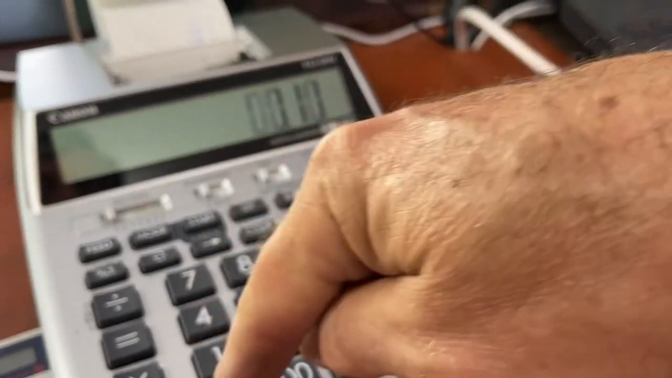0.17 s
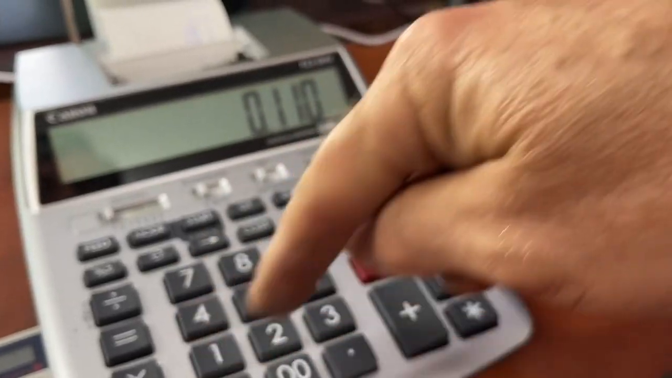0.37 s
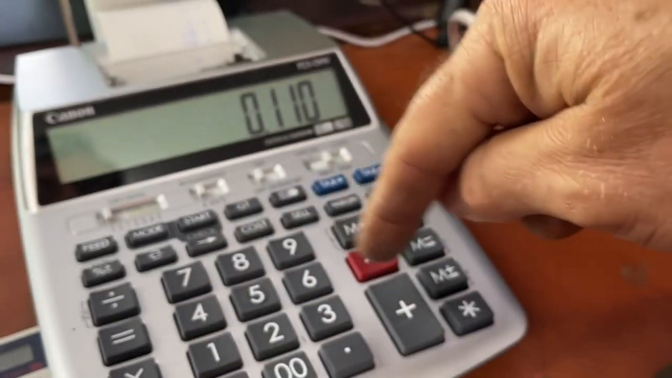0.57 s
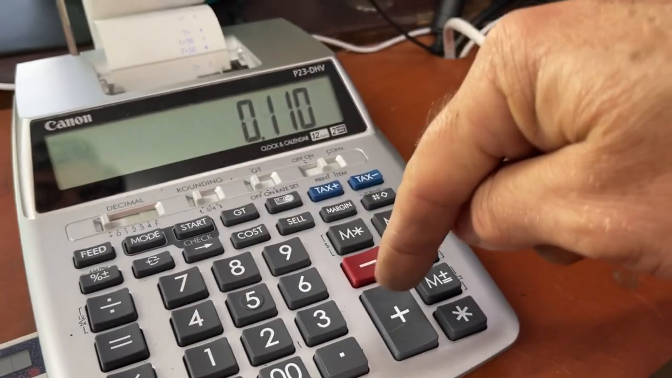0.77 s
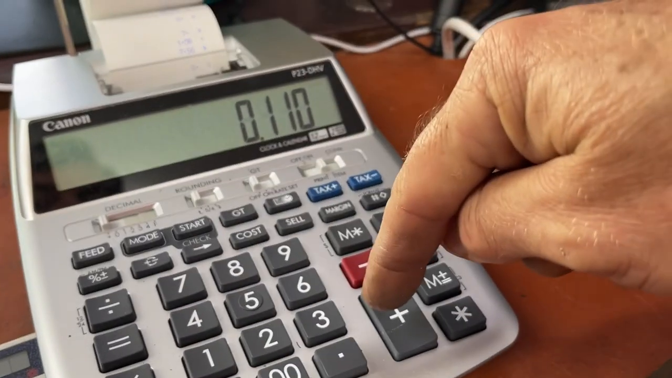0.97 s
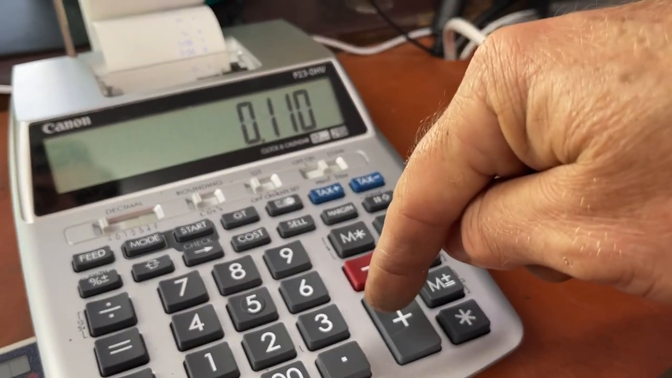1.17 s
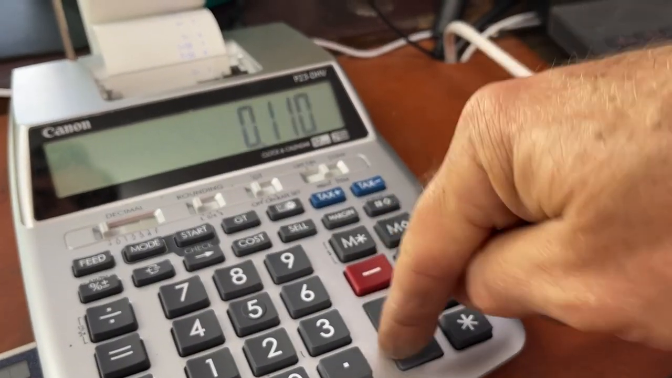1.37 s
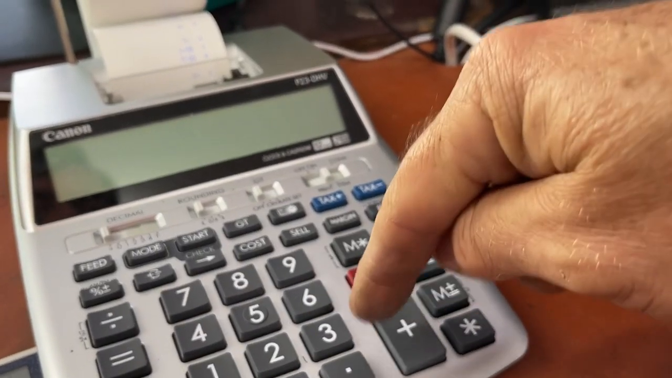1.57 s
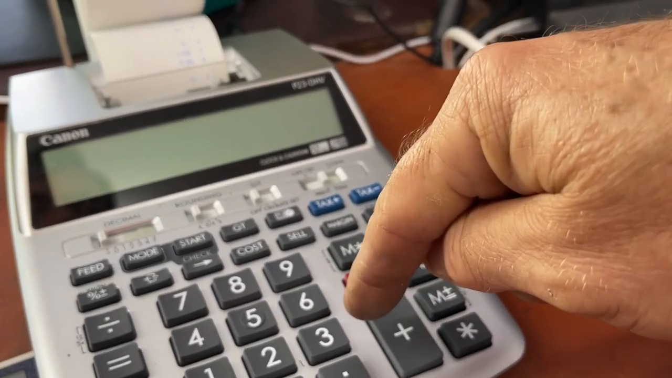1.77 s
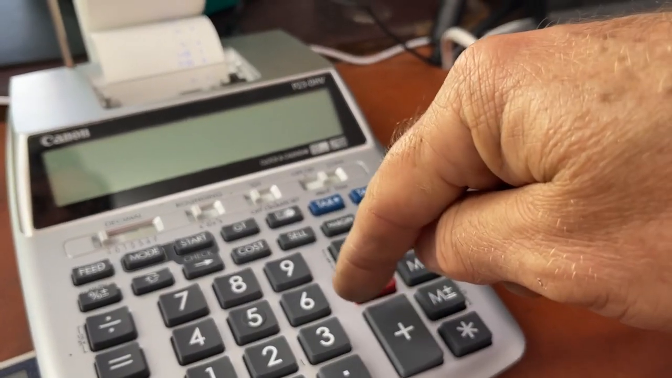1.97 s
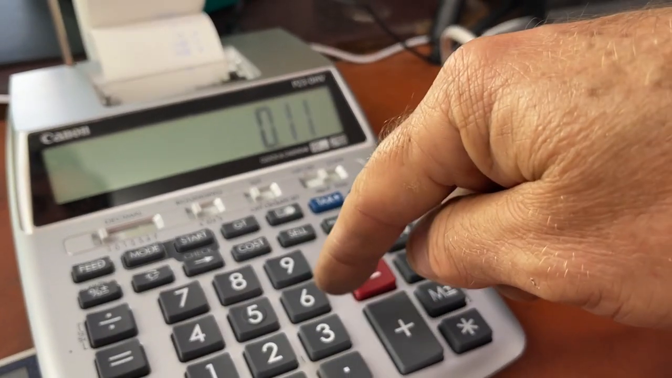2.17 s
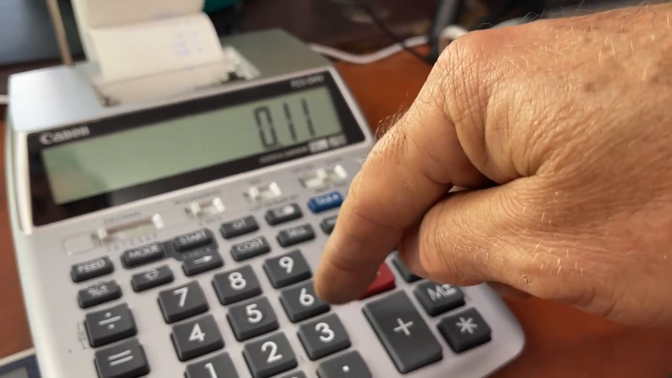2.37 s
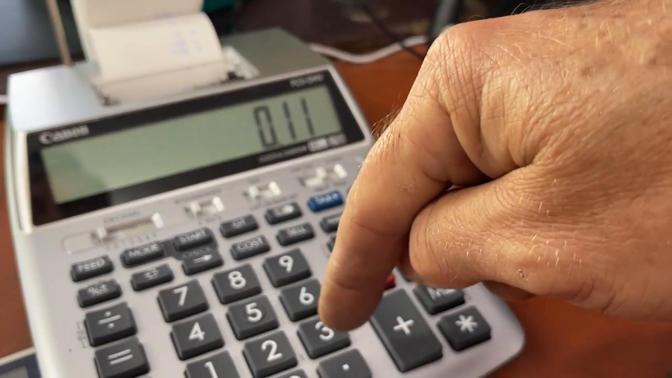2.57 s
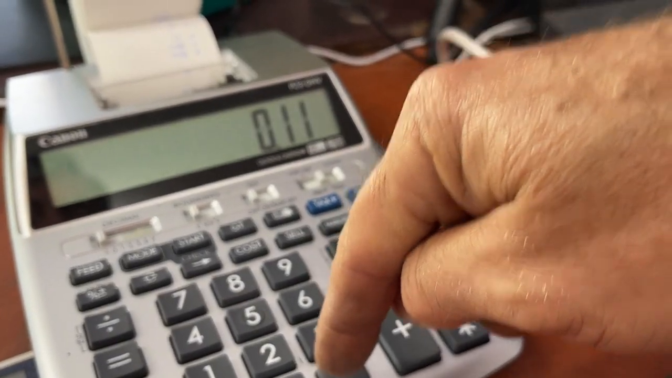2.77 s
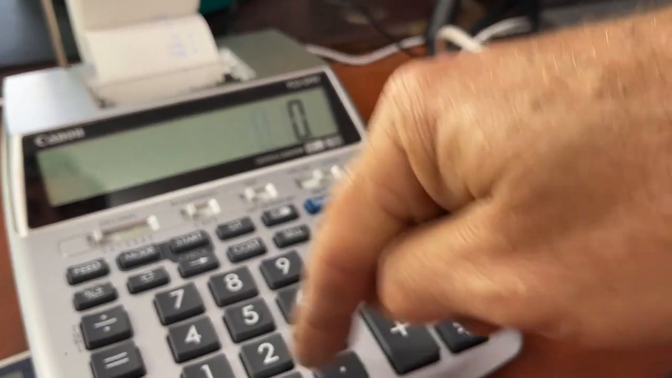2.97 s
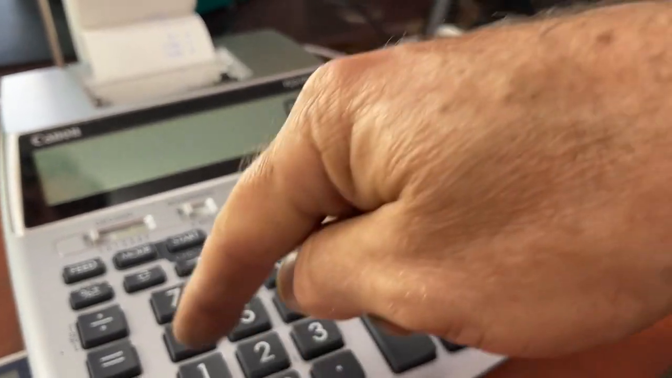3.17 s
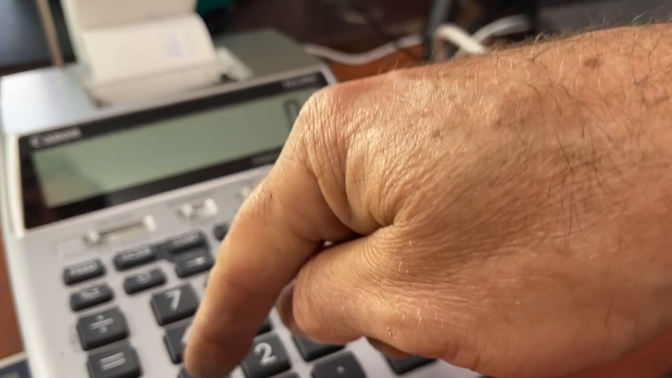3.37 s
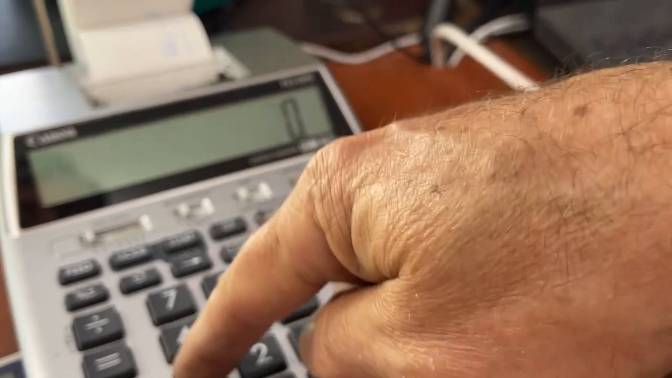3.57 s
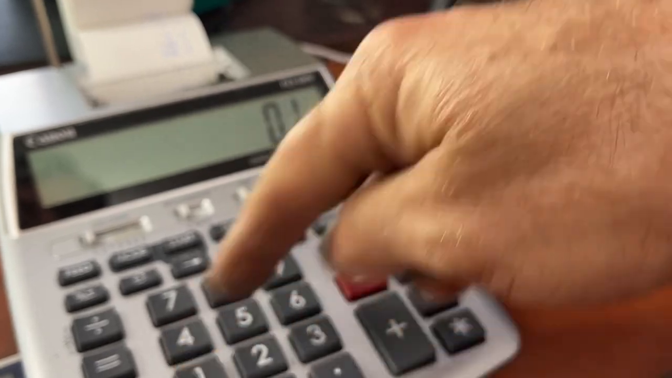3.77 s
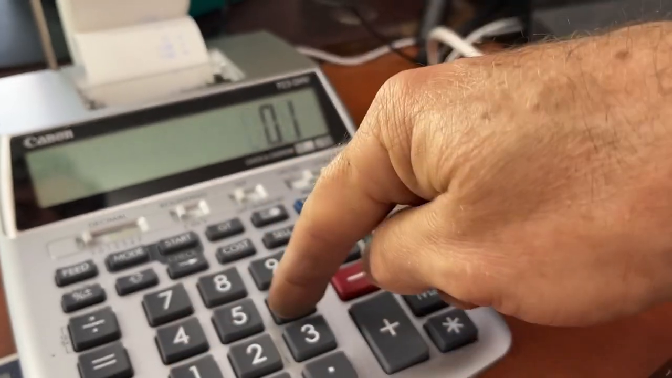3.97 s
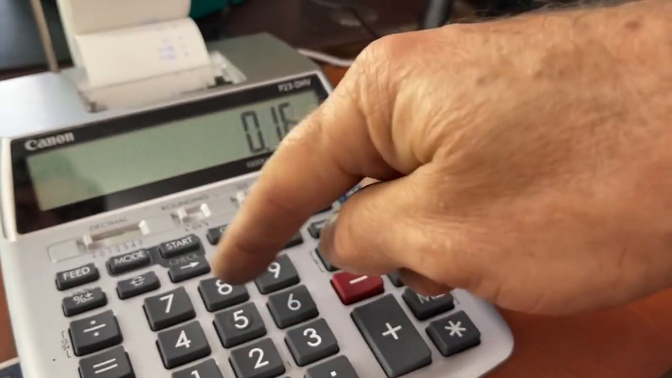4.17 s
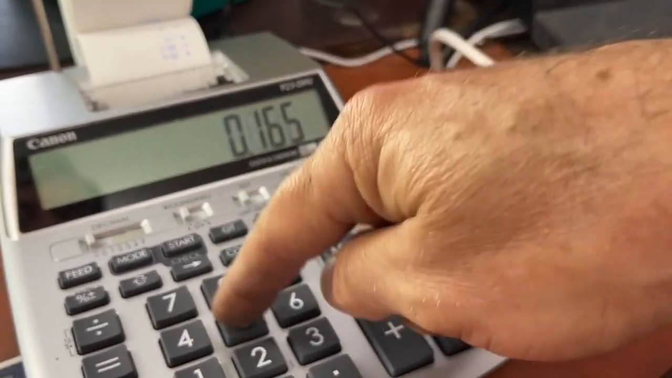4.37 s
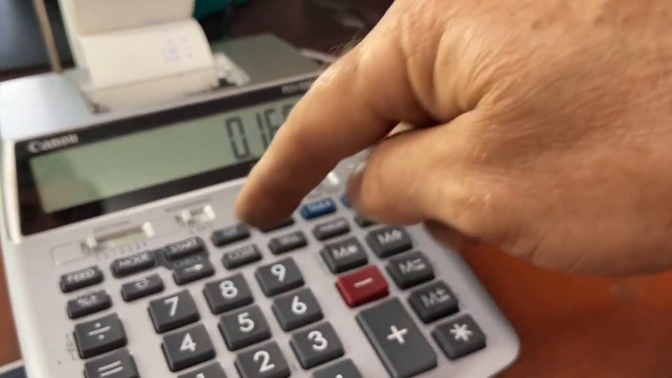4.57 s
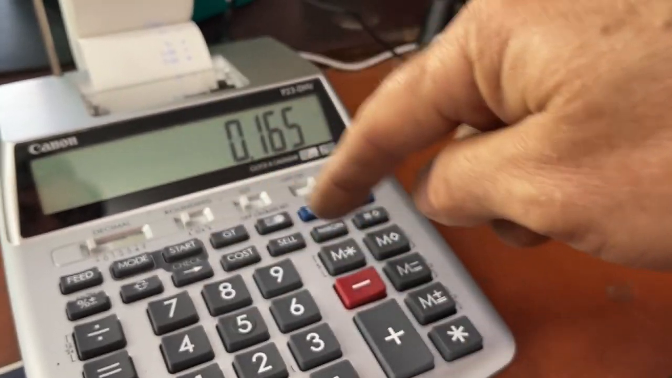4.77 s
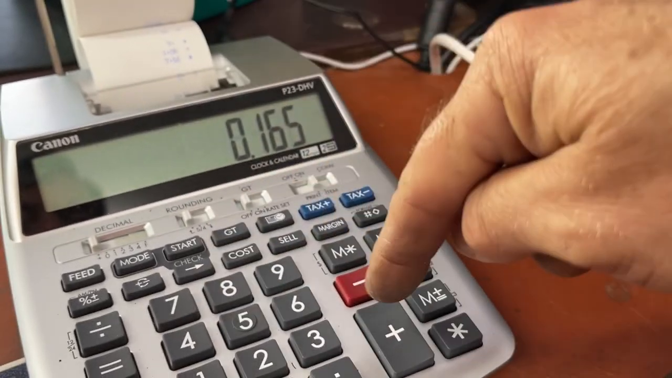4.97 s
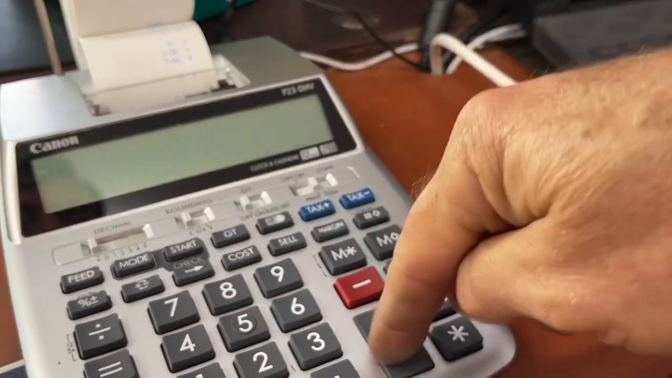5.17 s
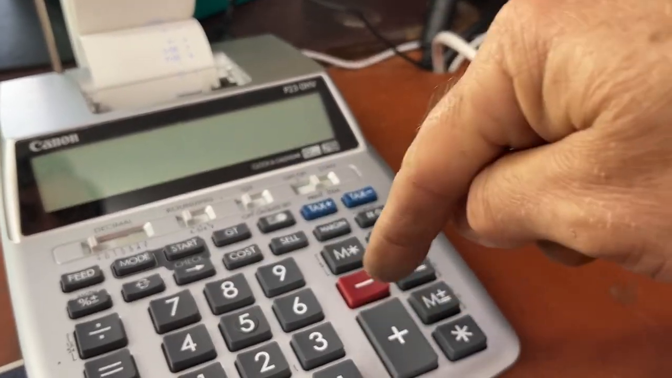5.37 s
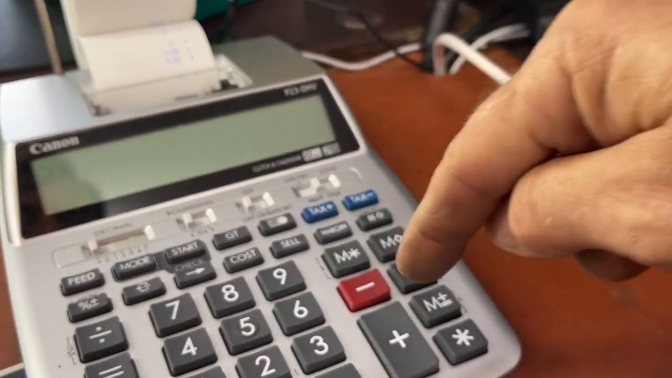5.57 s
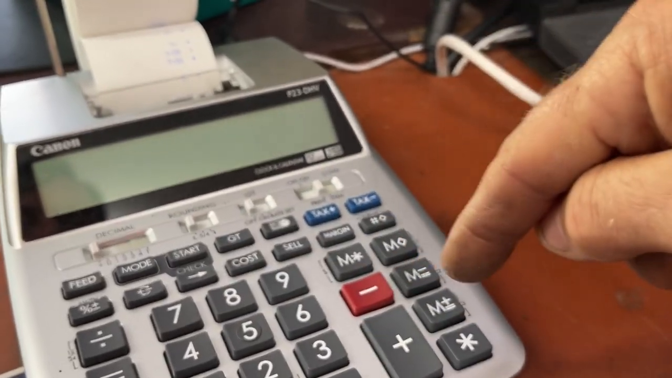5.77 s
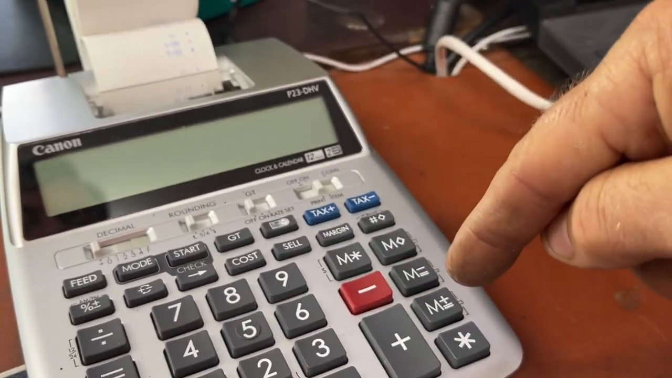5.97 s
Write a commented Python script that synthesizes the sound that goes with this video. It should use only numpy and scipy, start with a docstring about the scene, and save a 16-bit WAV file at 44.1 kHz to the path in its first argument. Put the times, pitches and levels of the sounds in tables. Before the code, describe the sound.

Close stereo pickup of plastic keys and a tiny printer on a desk. Single clicks with springy releases and soft case thumps come first and between two printing bursts. Each burst has a motor spinning up into a gritty, high whine under fast, snapping clatter, about ten strikes a second. A steady low hum and soft air fill the quiet room, with only a short dull reverberation.

```python
"""A quiet room with a low hum, and a desktop printing calculator close by.
Plastic keys click down and up: short bursts of tiny impacts ring each key cap and thump the case.
Twice a small geared motor spins up and prints a line; its sound follows the turning of its gear teeth.
For each character a pawl catches the type wheel, the type snaps on the paper and the lever falls back.
Fan and mains hum are wavering sine tones, over a soft rush of air made from coloured noise."""
import sys
import numpy as np
from scipy import signal
from scipy.fft import rfft, irfft, next_fast_len
from scipy.io import wavfile
from scipy.ndimage import uniform_filter1d

SR = 44100
rng = np.random.default_rng(int(sys.argv[2]) if len(sys.argv) > 2 else 0)


def generate_wav(sig):
    """Save sig (samples, or channels by samples) to the path in sys.argv[1] as 16-bit PCM at SR."""
    pcm = np.round(np.clip(np.atleast_2d(sig).T, -1, 1) * 32767).astype(np.int16)
    wavfile.write(sys.argv[1], SR, pcm)


N = 265393  # length of the scene in samples
TIME = np.arange(N) / SR
SIZE = 4096  # samples in one contact sound and in each body's response


def undb(db):
    """Turn decibels into an amplitude factor."""
    return 10 ** (np.asarray(db) / 20)


def unit(x):
    """Scale to an rms level of 1."""
    return x / np.sqrt(np.mean(x ** 2))


def wander(size):
    """Smooth random curve of rms 1: noise averaged over size samples."""
    return unit(uniform_filter1d(rng.standard_normal(N), size=size))


def bins(size):
    """Frequencies in Hz of a spectrum of size samples, kept at 1 Hz or more."""
    return np.maximum(np.arange(size // 2 + 1) * SR / size, 1)


def along(points, hz):
    """Read a curve of (Hz, value) points, with straight lines on a log-frequency axis."""
    point_hz, value = np.transpose(points)
    return np.interp(np.log(hz), np.log(point_hz), value)


def colour(points, size=SIZE):
    """Filter with the given (Hz, dB) outline that responds only after it is struck."""
    cepstrum = irfft(np.log(undb(along(points, bins(size)))))
    # folding the second half onto the first makes the filter minimum phase
    cepstrum[1:size // 2] *= 2
    cepstrum[size // 2 + 1:] = 0
    return np.exp(rfft(cepstrum))


def resonances(modes):
    """Filter of a body that rings at several (Hz, width Hz, dB) modes; a narrow mode rings longer."""
    f = bins(SIZE)
    total = 0
    for k, (hz, width, db) in enumerate(modes):
        sign = (-1) ** k
        total = total + sign * undb(db) / (1 + 1j * (f * f - hz * hz) / (f * width))
    return total


def add(out, s, db, body, rise, fall, scatter_db=0, blow=0):
    """Add one contact: tiny impacts swell and die (rise, fall in s) around a main blow, ringing a body."""
    lead = SIZE // 8
    t = (np.arange(SIZE) - lead) / SR
    envelope = np.exp(-np.maximum(-t / rise, t / fall))
    force = rng.choice([-1, 1], SIZE) * envelope
    force *= undb(scatter_db * rng.standard_normal(SIZE))
    force[lead] += blow * np.sqrt(np.sum(force ** 2))
    sound = irfft(rfft(force) * body)
    # the level db holds the contact's whole energy as if spread over 2 ms
    sound *= undb(db) * np.sqrt(.002 * SR / np.sum(sound ** 2))
    start = int(s * SR) - lead
    out[start:start + SIZE] += sound[:N - start]


def background(waver=0.22, bass_side_db=-21, treble_side_db=-12):
    """Fan and mains hum waver slightly over a soft rush of air; the bass is nearly alike on both sides."""
    # fan and mains tones: pitch_hz [Hz], level_db [dB rms]
    hum_tones = [(56.8, -48), (62, -59), (72.5, -50.5), (113.6, -47), (119.8, -46.5), (170.4, -46.5),
                 (212, -54.5), (220, -56.5), (240, -50.5), (284.5, -53), (293, -57), (490, -61.5),
                 (737.5, -65.5), (909.8, -63), (1367, -64.5), (1593, -69)]
    # outline of the room's air noise: pitch_hz [Hz], level_db [dB, relative]
    air_outline = [(25, -27), (42, -12), (55, -2.5), (90, -2.5), (125, -1.5), (220, -5.5), (400, -14),
                   (650, -21), (1400, -24.5), (2200, -31), (3900, -35.5), (5500, -40.5), (11200, -37.5),
                   (12500, -73)]
    air_db = -40.5  # rms level of the air
    f = bins(N)
    mid, side = rfft(rng.standard_normal((2, N))) * undb(along(air_outline, f))
    side = side * undb(along([(80, bass_side_db), (300, -4.0), (5000, treble_side_db)], f))
    air = undb(air_db) * unit(irfft(np.array([mid + side, mid - side]), N))
    hum = 0
    knots = np.linspace(0, TIME[-1], num=40)
    for hz, db in hum_tones:
        # swell moves the loudness, drift moves the phase in radians
        swell, drift = (np.interp(TIME, knots, row) for row in waver * rng.standard_normal((2, len(knots))))
        tone = np.sin(2 * np.pi * (hz * TIME + rng.random()) + drift)
        hum = hum + undb(db) * unit((1 + swell) * tone)
    return air + hum


def keys(ring_q=14, ring_db=10, release_thud_db=-6):
    """Keys hit their stops, then slip and spring back; caps ring and each contact thumps the case."""
    # keys going down: start_s [s], level_db [dB], brightness_db [dB at 6 kHz and up],
    # thud_db [dB against the click], low_ring_hz and high_ring_hz of the key cap [Hz]
    presses = [(0.1283, -27.5, -9.5, 5, 546, 2220), (1.349, -29.5, -3, 2, 1760, 4970),
               (2.827, -28, 5, 4, 3020, 5000), (2.8578, -41.5, 5, -6, 3000, 5120),
               (3.533, -38, -16, -5, 1100, 3000), (3.59, -42.5, -7, -2, 1750, 2300),
               (3.945, -39, -14, 12, 1100, 1760), (4.278, -42.5, -1, -2, 2300, 2920),
               (5.111, -30.5, 2.5, 10, 1730, 5000)]
    # keys springing back: start_s [s], level_db [dB], brightness_db [dB at 6 kHz and up],
    # slip_lead_s [s before the stop], slip_db [dB against the stop], low_ring_hz, high_ring_hz [Hz]
    releases = [(.2242, -25.5, 3.5, 0.0077, -.5, 2280, 3220), (1.466, -28, 9, 0.011, -17, 2920, 4900),
                (2.934, -23, 7.5, .014, -15, 2950, 4730), (3.678, -24.5, 4, .014, -13, 1730, 3700),
                (4.065, -28.5, 1.5, .014, -7.5, 2570, 5070), (4.357, -30, 5.5, 0.0066, -2, 2280, 2920),
                (5.1977, -23, 4, 0.012, 0, 2920, 3700)]
    # sound outline of the plastic keys: pitch_hz [Hz], level_db [dB, relative]
    key_outline = [(200, -17), (500, 0.5), (800, -8.5), (1200, -3), (2300, -1), (3200, -6), (4000, -9),
                   (5600, -10), (6500, -9), (8500, -9.5), (11200, -8.5), (14000, -73)]
    # resonances of the case on the desk: pitch_hz [Hz], width_hz [Hz], level_db [dB, relative]
    case_modes = [(80.6, 26, -7.5), (119, 35, 5), (216, 40, -5), (427, 62, -7)]
    out, plastic = np.zeros(N), colour(key_outline)
    # the rubber feet pass mainly the lows of the thump
    case = resonances(case_modes) * colour([(900, 1), (6000, -24)])

    def click(s, db, bright_db, thud_db, rings):
        """One contact of a key cap, and a slower thump of the case just after it."""
        body = plastic * colour([(2500, 0), (6000, bright_db)])
        for hz in rings:
            body = body * (1.0 + resonances([(hz, hz / ring_q, ring_db)]))
        add(out, s, db, body, rise=0.0012, fall=0.0023, blow=0.42)
        add(out, s + 0.00721, db + thud_db, case, rise=0.0045, fall=0.014)

    for s, db, bright_db, thud_db, *rings in presses:
        click(s, db, bright_db, thud_db, rings)
    for s, db, bright_db, slip_s, slip_db, *rings in releases:
        click(s - slip_s, db + slip_db, bright_db, release_thud_db, rings)
        click(s, db, bright_db, release_thud_db, rings)
    return out


def run_up(on_s, strikes):
    """The motor nears its free speed, sags after each strike and coasts down: tooth rate and loudness."""
    mesh_hz, spin_up_s = 2285.5, .068  # free speed in teeth per second, time constant
    sag_hz, sag_lag_s, sag_width_s = 54.97, 0.0218, .022
    cut_lag_s, coast_hz_per_s, coast_db = .036, 13300, -3
    quiet_below_hz = 720  # the gears fade out under this tooth rate
    coasting = np.maximum(TIME - strikes[-1][0] - cut_lag_s, 0)
    free = mesh_hz * (1 - np.exp(-np.maximum(TIME - on_s, 0) / spin_up_s))
    sag = sag_hz * sum(np.exp(-((TIME - s - sag_lag_s) / sag_width_s) ** 2) for s, _ in strikes)
    hz = np.maximum(free - sag - coast_hz_per_s * coasting, 1)
    gain = undb(coast_db * (coasting > 0)) / (1 + (quiet_below_hz / hz) ** 3)
    return hz, gain


def motor(hz, count=12, rough=1.0, scrape_db=-2, grind_db=-1, slack_hz=1930, knock_db=4):
    """A pinion of count teeth drives the gears: they knock while slow and slack, then sing and grind."""
    # tones of the gear train: order [multiple of the shaft rate], level_db [dB, relative]
    gear_orders = [(3, -22), (9, -12), (12, 2.5), (13, -11.5), (14, -13.5), (15, -15), (16, -21.5)]
    # overtones of the knocking teeth: order [multiple of the tooth rate], level_db [dB, relative]
    knock_orders = [(2, -3.5), (3, -5), (4, -13)]
    # sound outline of the gear train: pitch_hz [Hz], level_db [dB, relative]
    gear_outline = [(150, -16), (380, -7.5), (550, -1), (1100, -11), (1750, -2.5), (2050, -8.5), (2550, 3),
                    (3050, 4.5), (3500, -7), (3850, -9), (5800, -14.5), (8700, -8.5), (11000, -9),
                    (14000, -53)]
    # resonances of the gearbox: pitch_hz [Hz], width_hz [Hz], level_db [dB, relative]
    gearbox_modes = [(1710, 130, -10), (2530, 340, 1), (3030, 260, 2), (3730, 360, -7)]
    speed = hz * (1 + .005 * wander(size=400))
    teeth = np.cumsum(speed) / SR  # running count of teeth that have passed
    shaft, tooth = teeth / count, teeth.astype(int)
    slack = 1 / (1 + (speed / slack_hz) ** 12)  # near 1 when slow, lower when fast
    tones = 0
    for order, order_db in gear_orders:
        grip = undb(3.5 * wander(size=700))
        tones = tones + undb(order_db) * grip * np.sin(2 * np.pi * (round(order) * shaft + rng.random()))
    # every tooth lands with its own force, and the load swings once a shaft turn
    tooth_force = rng.standard_normal(tooth[-1] + 1)[tooth]
    tooth_pulse = np.exp(-12 * np.sin(np.pi * (teeth - .5)) ** 2)
    ticks = rough * unit(tooth_force * tooth_pulse)
    scrape = 2 * undb(scrape_db) * rng.standard_normal(N)
    grind = (ticks + scrape) * (1 + 0.2 * np.sin(2 * np.pi * shaft))
    drive = (1 - slack) * tones + (1 - 0.51 * slack) * undb(grind_db) * grind
    # loose teeth land early or late, hard or soft, and ring the gearbox
    play, force = .045 * wander(size=70), undb(4 * wander(size=250))
    overtones = sum(undb(k_db) * np.cos(2 * np.pi * round(k) * (teeth + play)) for k, k_db in knock_orders)
    knock = slack * force * overtones
    gears = signal.fftconvolve(drive, irfft(colour(gear_outline)))[:N]
    box = signal.fftconvolve(knock, irfft(resonances(gearbox_modes)))[:N]
    return gears + undb(knock_db) * box


def hammer(strikes, release_lag=0.01, rattle_db=-21, loose_db=5, uneven_db=2.46):
    """Each cam turn: the pawl catches, the type strikes, lifts off, and the lever drops back."""
    # sound outline of the pawl: pitch_hz [Hz], level_db [dB, relative]
    pawl_outline = [(150, -23), (550, 1.5), (750, -10.5), (900, -6.5), (1150, -5.5), (1750, -3),
                    (2050, -16), (2600, 4.5), (3600, -11.5), (5000, -11.5), (5900, -17.5), (8700, -8),
                    (11000, -8.5), (14000, -45)]
    # resonances of the type wheel and its frame: pitch_hz [Hz], width_hz [Hz], level_db [dB, relative]
    type_modes = [(654, 200, -9), (1754, 106, 0), (3030, 350, -3), (4945, 154, -4.5), (6490, 210, 2.5),
                  (8140, 450, 4), (8420, 470, 2.5), (8800, 530, 3), (10680, 690, 2), (11470, 630, -4.5),
                  (12060, 320, -8)]
    # resonances of the printer chassis: pitch_hz [Hz], width_hz [Hz], level_db [dB, relative]
    chassis_modes = [(393, 33, 0), (509, 63, -0.5), (614, 113, -2.5), (924, 63, 0.5), (1340, 150, -8),
                     (1730, 240, -4), (2900, 1350, -15.5), (4930, 1000, -14.5), (8350, 650, -20.5)]
    # the carriage latches once a line, after the third character:
    # lag_s [s after the strike], level_db [dB], metal_snap_db [dB]
    carriage_latch = [(0.023, -20, -20.5)]
    # the paper feed trips after the last character: lag_s [s after the strike], level_db [dB],
    # metal_snap_db [dB]
    feed_latch = [(.006, -26, -22), (.011, -24.5, -7), (0.0138, -18.5, -18)]
    # the cam times every character alike; catch and drop levels vary by uneven_db
    pawl_lead_s, pawl_db = .012, -15.5
    return_lag_s, return_db = .0322, -20.5
    out, pawl = np.zeros(N), colour(pawl_outline)
    wheel, chassis = resonances(type_modes), resonances(chassis_modes)
    for s, strike_db in strikes:
        catch_db, drop_db = uneven_db * rng.standard_normal(2)
        add(out, s - pawl_lead_s, pawl_db + catch_db, pawl, rise=0.0015, fall=0.0037)
        add(out, s, strike_db, wheel, rise=0.0011, fall=0.0013, blow=0.65)
        add(out, s + release_lag, strike_db - 19.5, wheel, rise=.002, fall=0.0056)
        add(out, s + return_lag_s, return_db + drop_db, pawl, rise=0.0017, fall=0.0022)
        # loose parts chatter on the chassis around the strike and the lever's return
        add(out, s - .007, rattle_db, chassis, rise=0.0013, fall=0.033, scatter_db=loose_db)
        add(out, s + return_lag_s, return_db - 5.5, chassis, rise=0.0024, fall=0.0092, scatter_db=loose_db)
    for (s, _), latch in ((strikes[2], carriage_latch), (strikes[-1], feed_latch)):
        for lag, db, snap_db in latch:
            add(out, s + lag, db, pawl, rise=0.0015, fall=0.0066)
            add(out, s + lag, snap_db, wheel, rise=0.0014, fall=0.00058)
            add(out, s + lag, db - 5.5, chassis, rise=0.0033, fall=0.0074, scatter_db=loose_db)
    return out


def printer():
    """For each line the motor runs while the cam hammers out the characters."""
    # printed lines: motor_on_s [s], motor_gain_db [dB]
    print_lines = [(1.349, -29.5), (5.116, -30.5)]
    # type strikes, one list a printed line: start_s [s], level_db [dB]
    line_strikes = [
        [(1.514, -11.5), (1.601, -13), (1.708, -11), (1.7843, -11.5), (1.8918, -11), (1.9904, -12.5),
         (2.1, -11.5)],
        [(5.2556, -10), (5.3437, -11.5), (5.4509, -10.5), (5.5437, -11), (5.6546, -9), (5.7402, -9.5),
         (5.8381, -9.5), (5.948, -8.5)],
    ]
    out = np.zeros(N)
    for (on_s, db), strikes in zip(print_lines, line_strikes):
        hz, gain = run_up(on_s, strikes)
        out += hammer(strikes) + undb(db) * gain * motor(hz)
    return out


def room(x, early_db=-13, early_t60=0.063, late_db=-19, late_t60=0.31):
    """Quick reflections from the desk and the things on it, then a short dull tail, as fading noise."""
    t = TIME[:SR // 2]

    def fading_noise(t60):
        """Separate noise for left and right, falling 60 dB in t60 seconds, silent for the first 2 ms."""
        return rng.standard_normal((2, len(t))) * undb(-60 * t / t60) * (t > .002)

    early, late = fading_noise(early_t60), fading_noise(late_t60)
    late = signal.lfilter(*signal.butter(1, 6000, fs=SR), late)
    response = (undb(early_db) * unit(early) + undb(late_db) * unit(late)) / np.sqrt(len(t))
    return x + signal.fftconvolve(np.array([x, x]), response, axes=1)[:, :N]


def ports(x):
    """Treble reaches two microphone ports out of step; above the deep bass the right is a little louder."""
    # how far the left port leads the right: pitch_hz [Hz], lead_rad [radians]
    port_phase = [(2200, 0), (3100, -.65), (3900, -.3), (7200, -.55), (7900, -1), (8600, -.5), (9800, 2.4),
                  (10700, 3.7), (12000, 6.2), (15000, 12.5)]
    # left level minus right level: pitch_hz [Hz], balance_db [dB]
    port_balance = [(60, 0.26), (380, -1.9), (1290, -1.4), (2380, -1.1), (4400, -1.4), (8120, -0.25)]
    size = next_fast_len(N, real=True)
    f = bins(size)
    # each port takes half of the difference
    lean = np.exp(.5j * along(port_phase, f)) * undb(along(port_balance, f) / 2)
    return irfft(rfft(x, size) * np.array([lean, 1 / lean]), size)[:, :N]


def scene():
    """The calculator on its desk, over the hum of the room."""
    return room(keys() + printer()) + background()


def record(dry):
    """Two close ports pick it up; peaks are clipped at full scale, then the top above 16 kHz is cut."""
    heard = np.clip(ports(dry), -1, 1)
    return signal.sosfilt(signal.ellip(8, .2, 70, 16000, fs=SR, output="sos"), heard)


dry = scene()
out = record(dry)
generate_wav(out)
```